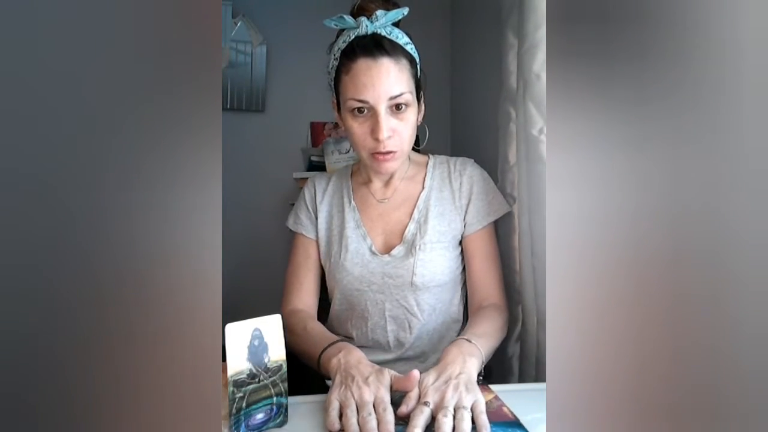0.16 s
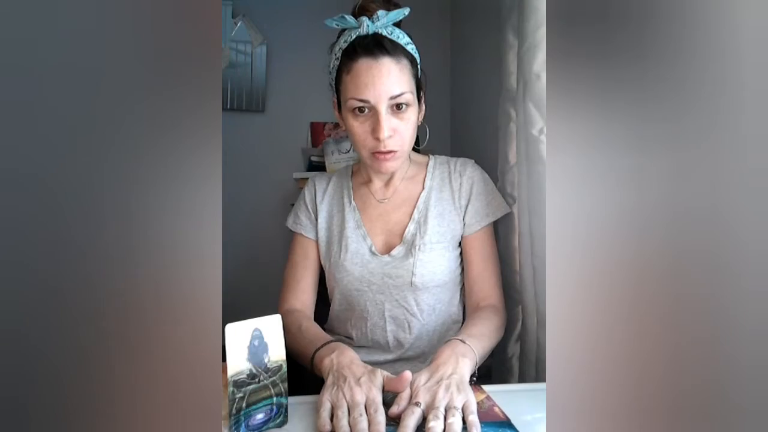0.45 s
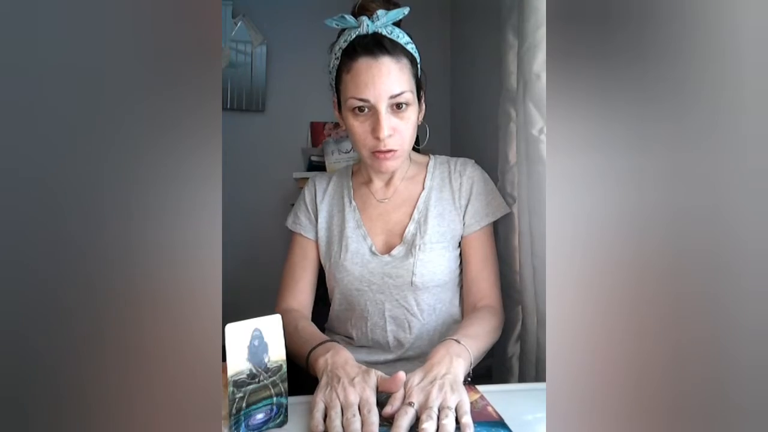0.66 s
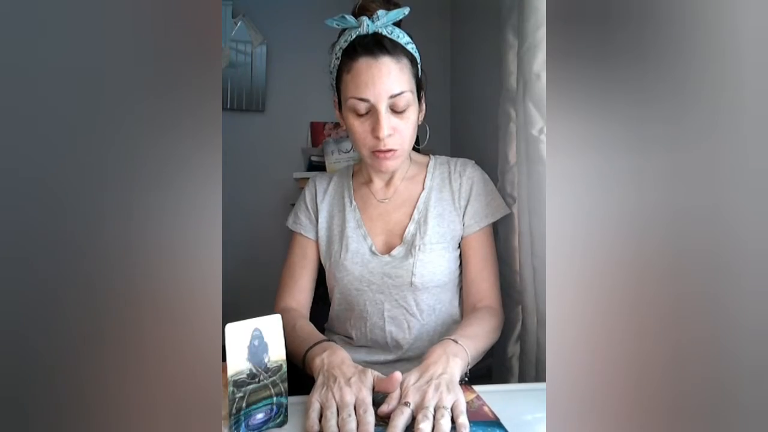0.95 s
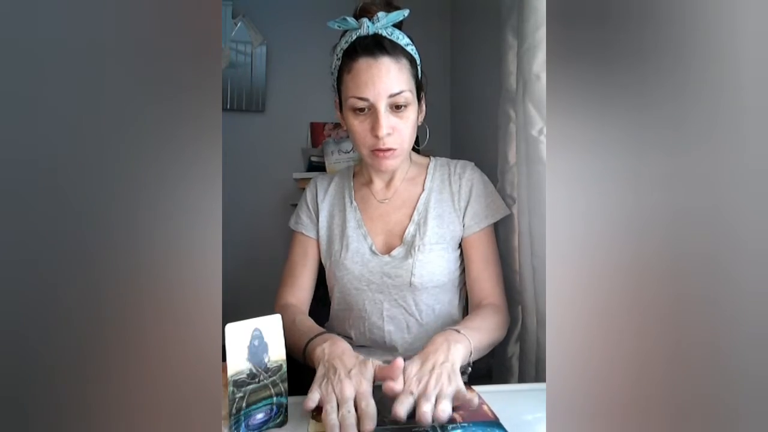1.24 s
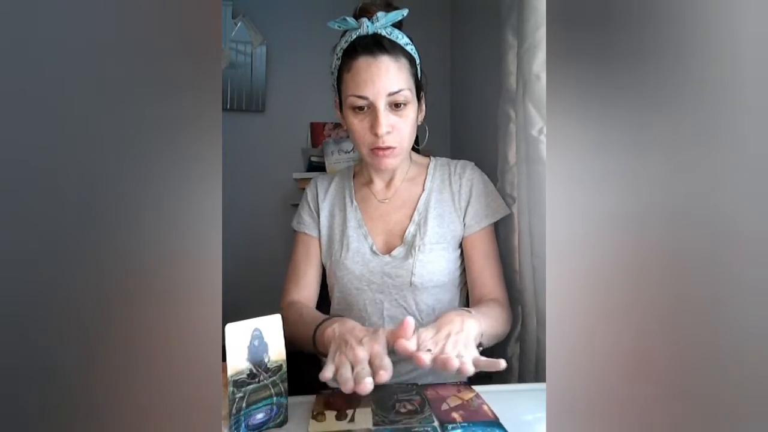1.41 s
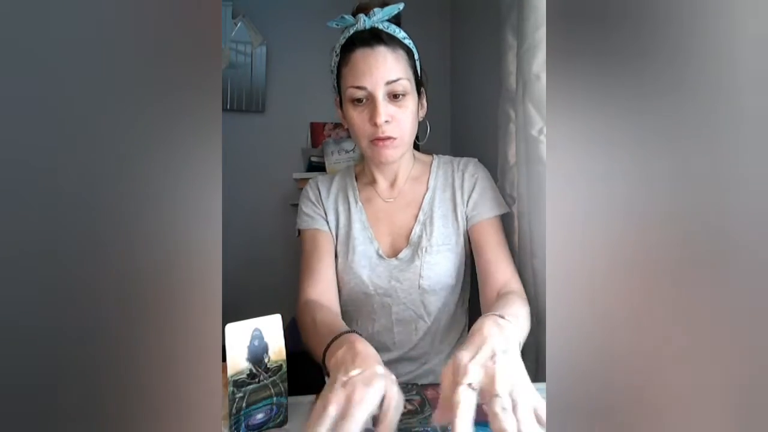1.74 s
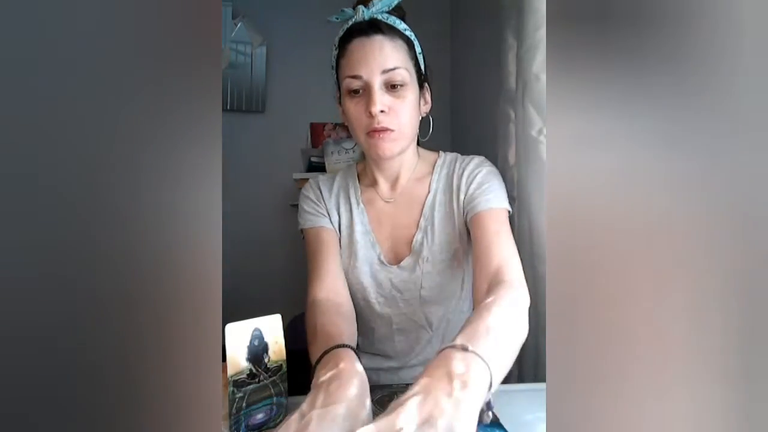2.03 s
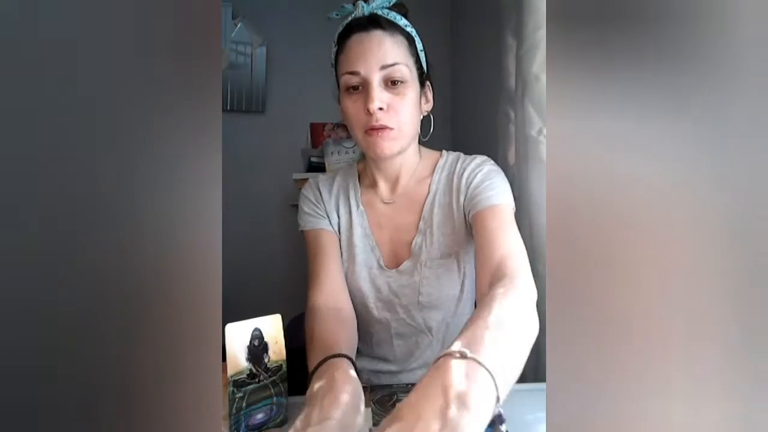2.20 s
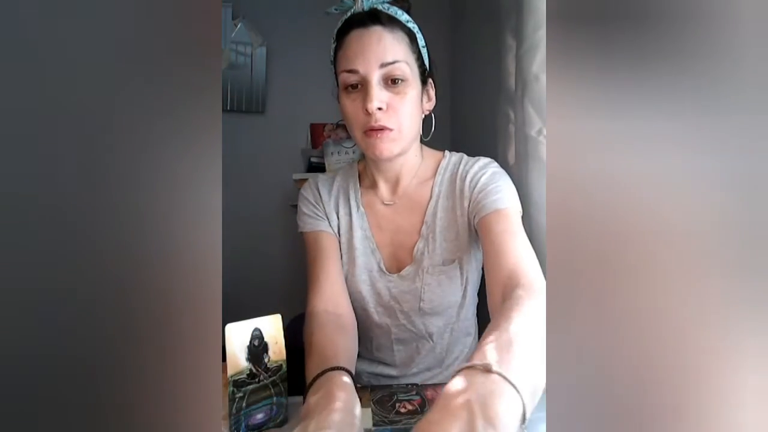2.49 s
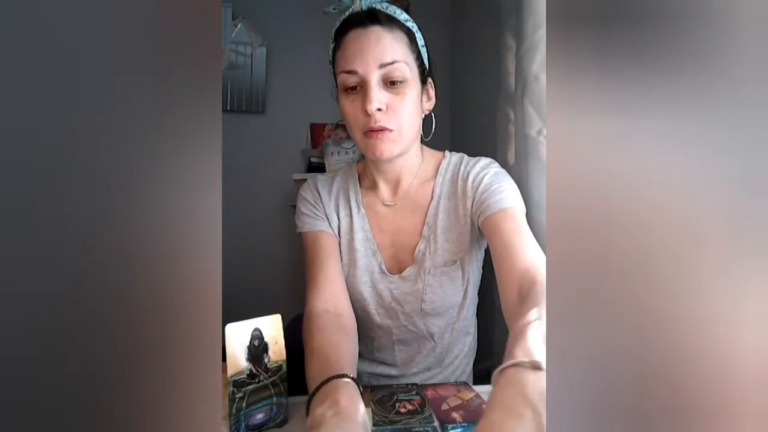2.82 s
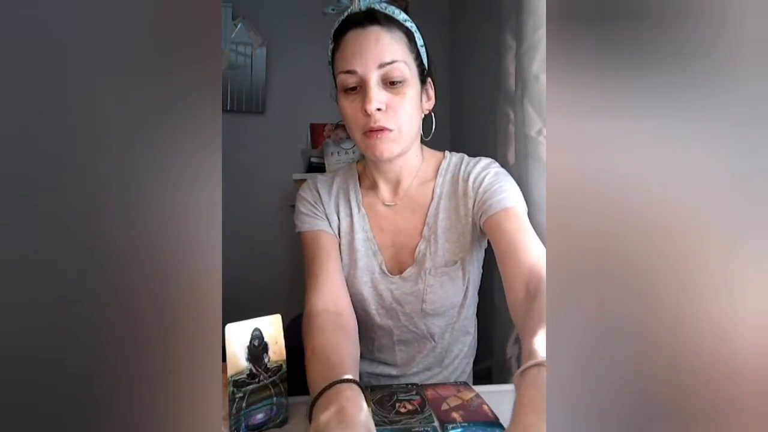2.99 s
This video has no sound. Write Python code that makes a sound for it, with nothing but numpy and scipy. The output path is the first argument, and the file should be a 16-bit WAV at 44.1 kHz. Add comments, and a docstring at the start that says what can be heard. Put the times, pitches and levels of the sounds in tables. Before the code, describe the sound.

A heap of small stones rattles on a table in a quiet room, heard close up. Soft skin rubbing and tiny taps come first, then a short pause, gentle nudging clicks and a sudden loud clatter.

```python
"""Indoors at a table, close to a laptop-type microphone: palms slide over the top, fingertips tap,
then a heap of small polished stones is nudged and pushed together. Palms, taps and scrape are coloured
noise; each knock is noise in a bright tick, a short clack and a thud of the tabletop, the tick and clack
with a fading note each. Glints add the top octave; a low room rumble with faint hiss lies underneath."""
import sys
import numpy as np
from scipy import signal
from scipy.fft import rfft, irfft, next_fast_len
from scipy.io import wavfile
from scipy.ndimage import uniform_filter1d

SR = 44100
rng = np.random.default_rng(int(sys.argv[2]) if len(sys.argv) > 2 else 0)


def bounce(signal):
    """Save signal as a 16-bit WAV file at the path given by the first command-line argument."""
    frames = np.transpose(np.atleast_2d(signal))
    limited = np.clip(frames, -1, 1)
    pcm = np.round(limited * 32767).astype(np.int16)
    wavfile.write(sys.argv[1], SR, pcm)


N = 138915
T = np.arange(N) / SR
SIZE = next_fast_len(N + 8192)  # padded so that filter tails do not wrap round
F = np.maximum(np.arange(SIZE // 2 + 1) * SR / SIZE, 1)

# small knocks as the heap rolls [t/s, tick level/dB, clack level/dB, thud level/dB]
RATTLE = [(2.46, -29, -40, -18), (2.524, -26.5, -26, -22.5), (2.652, -24.5, -21.5, -12.5),
          (2.762, -19, -16, -16), (2.87, -25, -16.5, -13), (2.928, -23.5, -15.5, -11),
          (3.122, -27, -18.5, -18), (3.15, -21, -21, -13)]
# stones on the table as the microphone colours them [f/Hz, relative level per Hz/dB]
STONE = [(50, -36), (91, -16), (269, -5.5), (387, -5), (611, -5), (942, -7), (1290, -10), (2190, -12.5),
         (2410, -19), (2650, -15), (4610, -25), (6610, -17), (9260, -39.5), (15700, -60.5)]
# skin on the tabletop at the microphone [f/Hz, relative level per Hz/dB]
PALM = [(260, -31.5), (450, 8.5), (592, -2.5), (1490, -3), (1730, -6.5), (2370, -4), (3680, -12),
        (6470, -1), (9770, -30), (15600, -64)]

# edges between thud, clack, tick and glint
THUD_TOP_HZ, TICK_FROM_HZ, GLINT_FROM_HZ = 938, 3420, 9230
TAIL_T60_S = 0.075  # weak longer tail of knocks and glints
CRACK_DB = 2.5  # first contact, over the noise


def undb(db):
    """Amplitude ratio of a level in dB."""
    return 10 ** (np.asarray(db) / 20)


def unit(x):
    """Signal scaled to rms 1."""
    return x / np.sqrt(np.mean(x ** 2))


def unit_response(response):
    """Response scaled so that white noise keeps its power."""
    return response / np.sqrt(np.mean(abs(response) ** 2))


def curve(table):
    """Columns of a time table as dense lines."""
    columns = np.array(table).T
    return [np.interp(T, columns[0], column) for column in columns[1:]]


def colour(points, lo_hz=0., hi_hz=1e6):
    """Minimum-phase response through (Hz, dB) points between two edges; noise passes at gain 1."""
    hz, db = np.array(points).T
    gain = undb(np.interp(np.log(F), np.log(hz), db))
    gain = gain / np.sqrt((1 + (lo_hz / F) ** 6) * (1 + (F / hi_hz) ** 6))
    # folding the cepstrum makes the response causal
    cepstrum = irfft(np.log(unit(gain) + 1e-9), SIZE)
    cepstrum[1:SIZE // 2] *= 2
    cepstrum[SIZE // 2 + 1:] = 0
    return np.exp(rfft(cepstrum))


def through(x, response):
    """Signal filtered by a frequency response."""
    return irfft(rfft(x, SIZE) * response, SIZE)[:N]


def ring(hz, db, t60):
    """Response of one resonance: peak level and bandwidth set by its decay."""
    return undb(db) / (1 + 1j * (F - hz) * 2 * np.pi * t60 / np.log(1000))


def walk(rate):
    """Slow random line of spread 1: noise smoothed twice over 1 / rate seconds."""
    width = int(SR / rate)
    smoothed = uniform_filter1d(rng.standard_normal(N), width)
    return unit(uniform_filter1d(smoothed, width))


def bursts(times, dbs, t60, rise, tail_db):
    """Noise that swells quickly at each time and dies away, with one sharp crack and a weak longer tail."""
    kicks = np.zeros(N)  # in power, so overlapping bursts add up
    np.add.at(kicks, np.clip((times * SR).astype(int), 0, N - 1), undb(2 * dbs))

    def fade(seconds):
        """Power dying by 60 dB in the given time."""
        return signal.lfilter([1], [1, -undb(-120 / (seconds * SR))], kicks)

    pole = np.exp(-1 / (rise * SR))
    decays = fade(t60) + undb(2 * tail_db) * fade(TAIL_T60_S)
    power = signal.lfilter([1 - pole], [1, -pole], decays)
    crack = np.pad(np.sqrt(kicks), (int(rise * SR), 0))[:N]
    return np.sqrt(power) * rng.standard_normal(N) + undb(CRACK_DB) * crack


def room():
    """Low rumble whose bands waver on their own, over a faint smooth hiss."""
    # colour of the room [f/Hz, relative level per Hz/dB]
    tone = [(25, -17.5), (74, -16.5), (96, 0.5), (148, -8), (228, -3), (361, -5), (391, -14), (460, -19),
            (570, -23), (1060, -29.5), (15700, -52.5)]
    level_db, flicker_db = -50.5, 2.1
    edges_hz = [0., 80., 130., 200., 300., 450., 1e6]
    spectrum = rfft(through(rng.standard_normal(N), colour(tone)), SIZE)
    bands = [irfft(spectrum * (F >= lo) * (F < hi), SIZE)[:N] for lo, hi in zip(edges_hz, edges_hz[1:])]
    rumble = sum(band * undb(flicker_db * walk(11.0)) for band in bands[:-1])
    hiss = bands[-1]
    return undb(level_db) * (rumble + hiss)


def palms():
    """Skin rubbing on the tabletop: fine-grained hiss whose low and high part flicker apart."""
    # sliding palms [t/s, level/dB, treble over low part/dB]
    slide = [(0.0, -47.5, -1.5), (0.166, -49, -4.5), (0.246, -56.5, -7.5), (0.366, -53.5, -6),
             (0.424, -61, -9.5), (0.722, -53.5, -7.5), (1.074, -74, -7.5), (1.14, -70, 5),
             (1.23, -67.5, -5), (1.36, -69, -14)]
    flicker_db = 0.84
    level_db, treble_db = curve(slide)
    level_db = level_db - 200 * np.clip(T - slide[-1][0], 0, 1)  # dies at 200 dB/s after the last row
    low = through(rng.standard_normal(N), colour(PALM, 606.0, TICK_FROM_HZ))
    high = through(rng.standard_normal(N), colour(PALM, TICK_FROM_HZ))
    level = undb(level_db + flicker_db * walk(33))
    treble = undb(treble_db + flicker_db * walk(30))
    return level * (low + high * treble)


def fingers():
    """Short fingertip taps and scuffs: a click, then noise with a quick fade, ringing in bands."""
    # taps [t/s, tick level/dB, clack level/dB, time for the power to fall by e (2 ms at least)/s]
    taps = [(1.1485, -48.5, -51.5, 0.0028), (1.158, -55, -62, 0.0064), (1.1703, -46.5, -60, 0.0022),
            (1.176, -64, -51.5, 0.0045), (1.261, -63, -63, .006), (1.316, -62, -56, .003),
            (1.39, -58, -43, 0.0032), (1.404, -50, -40, 0.0025), (1.412, -49, -44, 0.0031),
            (1.419, -65, -48.5, 0.008)]
    # what the taps ring with [f/Hz, level/dB]
    tap_rings = [(800, 0), (2210, -5), (2910, -5), (3970, -2), (4900, 0), (6150, 4), (6750, 8)]
    ring_t60_s, crack_db = 0.0063, 14
    rings = .5 + sum(ring(hz, db, ring_t60_s) for hz, db in tap_rings)
    out = 0
    for column, lo_hz, hi_hz in ((1, TICK_FROM_HZ, 1e6), (2, 300.0, TICK_FROM_HZ)):
        power = np.zeros(N)
        for tap in taps:
            fade = np.exp(-np.clip(T - tap[0], 0, 1) / max(tap[3], .002))
            power += undb(2 * tap[column]) * (T >= tap[0]) * fade
        # the click sits where the power jumps up
        click = -undb(crack_db) * np.sqrt(np.clip(np.diff(power, prepend=0), 0, None))
        hiss = np.sqrt(power) * rng.standard_normal(N)
        out = out + through(hiss + click, unit_response(colour(PALM, lo_hz, hi_hz) * rings))
    return out


def glints():
    """Bright stone edges: uneven top-octave bursts, some set, small random ones whose level follows the ticks."""
    # set glints [t/s, peak level/dB]
    set_glints = [(2.663, -33.5), (2.7132, -36), (2.7307, -33), (2.7511, -22.5), (2.794, -31),
                  (2.8104, -30), (2.828, -29), (2.9517, -28), (2.9687, -29), (2.9966, -38), (3.0175, -39),
                  (3.0555, -32), (3.117, -32.5)]
    small_count, small_over_ticks_db, small_spread_db = 150, -25, 3.5
    when = rng.uniform(RATTLE[0][0], (N - 1) / SR, small_count)
    small_db = curve(RATTLE)[0][(when * SR).astype(int)] + small_over_ticks_db
    small_db = small_db + small_spread_db * rng.standard_normal(small_count)
    set_times, set_db = np.array(set_glints).T
    times, dbs = np.append(set_times, when), np.append(set_db, small_db)
    edge = 1 / np.sqrt(1 + (GLINT_FROM_HZ / F) ** 20)  # steep lower edge
    response = colour(STONE, GLINT_FROM_HZ) * (0.5 + ring(13300, 5, .004)) * edge
    return through(bursts(times, dbs, t60=0.0069, rise=0.0023, tail_db=-19), unit_response(response))


def body(lo_hz, hi_hz):
    """Colour of one part of a knock, with the resonances of tabletop and stones on top."""
    # resonances [f/Hz, level among the rings/dB, t60/s]
    resonances = [(107, -3.5, 0.12), (196, -3, 0.15), (388, 2, 0.053), (447, 3, 0.068), (579, 2, 0.091),
                  (1278, 4, 0.054), (1497, 6, 0.04), (1877, 3, 0.093), (2380, 11, 0.042)]
    rings_db = -4  # all rings, over the direct sound
    rings = undb(rings_db) * sum(ring(*row) for row in resonances)
    return unit_response(colour(STONE, lo_hz, hi_hz) * (1 + rings))


def notes(times, dbs, hz, t60, rise):
    """One fading partial for each knock: a sine with a soft start."""
    k = np.arange(1400)
    s = k / SR
    shape = (1 - np.exp(-s / rise)) ** 2 * np.exp(-np.log(1000) * s / t60)
    partials = undb(dbs)[:, None] * shape * np.sin(2 * np.pi * hz[:, None] * s)
    out = np.zeros(N + len(k))
    np.add.at(out, (times * SR).astype(int)[:, None] + k, partials)
    return out[:N]


def stones():
    """Loud knocks at set moments, small random ones over a scrape; each has its own mix and notes."""
    # loud knocks [t/s, tick level/dB, clack level/dB, thud level/dB, tick note f/Hz, clack note f/Hz]
    knocks = [(2.163, -48.5, -51, -43, 7200, 2460), (2.175, -47, -43, -32.5, 7080, 1220),
              (2.271, -23, -24, -24, 5900, 2830), (2.3415, -31.5, -33, -33, 6300, 2520),
              (2.351, -47, -24.5, -40, 6350, 1130), (2.458, -11, -8.5, -35, 6460, 1294),
              (2.4776, -8.5, -7, -9.5, 5660, 1050), (2.4836, -19, -8.5, -18, 6600, 1110),
              (2.4863, -10, -16, -12.5, 6900, 1540), (2.5051, -28, -12, -15.5, 6950, 1460),
              (2.5276, -12.5, -24, -15.5, 6510, 1130), (2.5536, -14.5, -12, -38, 6570, 1300),
              (2.584, -16.5, -18, -10, 6360, 1210), (2.6386, -24, -13, -15, 7360, 1310),
              (2.6688, -16, -14.5, -19, 6700, 1290), (2.6848, -16.5, -8, -26, 6550, 2420),
              (2.7323, -12, -18, -26, 6200, 1190), (2.741, -14, -34, -25, 5800, 1420),
              (2.7462, -9, -13, -21, 5970, 1475), (2.7518, -4.5, -8.5, -17, 6050, 1940),
              (2.763, -13, -21, -28, 6140, 1550), (2.77, -29, -23, -30, 5590, 1300),
              (2.7864, -9.5, -7, -15, 7380, 2414), (2.81, -10.5, -9, -17, 6840, 2390),
              (2.83, -17, -26, -31, 5950, 1550), (2.8417, -13, -10.5, -10, 6160, 1230),
              (2.8825, -35, -9, -8, 6060, 2010), (2.9127, -18.5, -7, -4.5, 6470, 1270),
              (2.9295, -18, -7, -11, 7000, 1950), (2.9376, -15, -26, -12, 6530, 1370),
              (2.951, -13, -16, -30, 6000, 2120), (2.9624, -18.5, -16, -29, 6300, 1830),
              (2.9691, -8, -18, -22, 4400, 1890), (2.9845, -14, -13, -4, 6900, 1720),
              (3.0168, -13.5, -12, -8, 6550, 1360), (3.022, -15, -17, -27, 6850, 1410),
              (3.0559, -10, -16, -10.5, 6030, 1280), (3.0658, -13, -12, -16, 7120, 1180),
              (3.1157, -13, -22, -34, 6650, 1160)]
    # small knocks as the heap is nudged [t/s, tick level/dB, clack level/dB, thud level/dB]
    nudge = [(2.1, -102, -79, -79), (2.25, -42.5, -53, -37.5), (2.276, -46, -34.5, -31),
             (2.332, -46.5, -67, -46.5), (2.35, -45, -43, -30.5), (2.396, -46.5, -51, -44),
             (2.448, -30, -37, -20)]
    # tick, clack, thud [from f/Hz, to f/Hz, t60/s, rise/s, scatter of small knocks/dB, tail level/dB]
    parts = [(TICK_FROM_HZ, GLINT_FROM_HZ, 0.0039, 0.00082, 3.7, -16),
             (THUD_TOP_HZ, TICK_FROM_HZ, 0.0051, .0008, 2.35, -12),
             (0., THUD_TOP_HZ, 0.018, 0.00394, 1.4, -9)]
    # a stone's own note in tick and clack [lowest f/Hz and highest f/Hz of the small stones, t60/s,
    # level over the noise for loud knocks/dB, the same for small knocks/dB]
    stone_notes = [(5110, 7800, 0.0096, 3.6, 3), (1133, 4100, 0.024, 1.6, -5)]
    rattle_per_s = 260
    own_db = 2  # each part of a small knock strays on its own
    scrape_db = -13  # stones dragging, under the small knocks
    # the nudged heap knocks more evenly than the rolling one, and its stones damp each other
    nudge_scatter, nudge_note_db = 0.44, -1

    heap = list(nudge) + list(RATTLE)
    start = heap[0][0]
    count = int(rattle_per_s * (N / SR - start))
    when = rng.uniform(start, (N - 1) / SR, count)
    size = np.minimum(rng.exponential(size=count), 3)
    size = size * np.where(when < RATTLE[0][0], nudge_scatter, 1)
    loud = np.array(knocks).T
    times = np.append(loud[0], when)
    damping_db = nudge_note_db * (times < nudge[-1][0])
    out = 0
    for part, (settings, line_db) in enumerate(zip(parts, curve(heap))):
        lo_hz, hi_hz, t60, rise, scatter_db, tail_db = settings
        loud_db = loud[1 + part]
        small_db = scatter_db * size + own_db * rng.standard_normal(count)
        small_db = small_db - 10 * np.log10(np.mean(undb(2 * small_db)))  # mean power 1
        small_db = small_db + line_db[(when * SR).astype(int)]
        scrape = (T > start) * undb(line_db + scrape_db) * rng.standard_normal(N)
        hits = bursts(times, np.append(loud_db, small_db), t60, rise, tail_db)
        out = out + through(hits + scrape, body(lo_hz, hi_hz))
        if part < len(stone_notes):  # the thud has no note
            low_hz, high_hz, note_t60, loud_over_db, small_over_db = stone_notes[part]
            note_db = np.append(loud_db + loud_over_db, small_db + small_over_db) + damping_db
            small_hz = low_hz * (high_hz / low_hz) ** rng.random(count)
            note_hz = np.append(loud[4 + part], small_hz)
            out = out + notes(times, note_db, note_hz, note_t60, rise)
    return out


def scene():
    """All layers at one microphone, the same on both channels."""
    mono = stones() + glints() + fingers() + palms() + room()
    return np.array([mono, mono])


def record(dry):
    """The loudest peaks are rounded, then the top is cut steeply."""
    top_hz = 15850
    rounded = np.tanh(.7 * dry) / 0.69
    return signal.sosfilt(signal.ellip(10, .2, 60, top_hz, fs=SR, output="sos"), rounded)


dry = scene()
out = record(dry)
bounce(out)
```